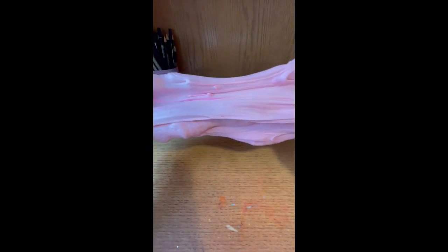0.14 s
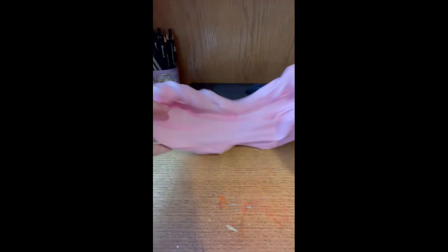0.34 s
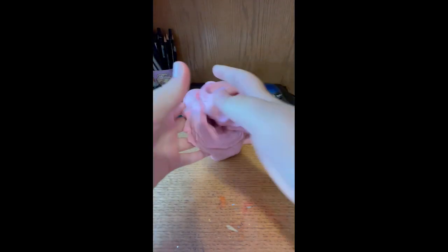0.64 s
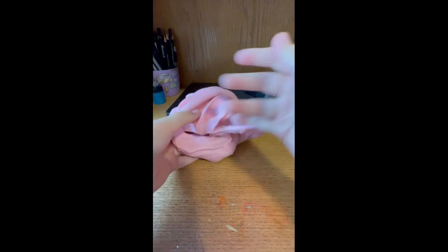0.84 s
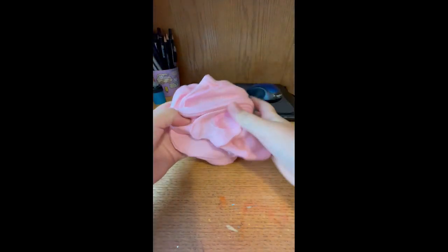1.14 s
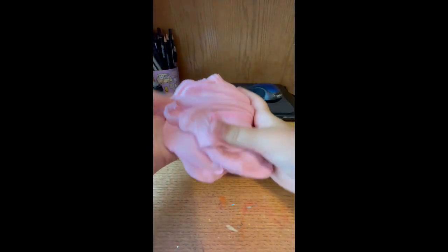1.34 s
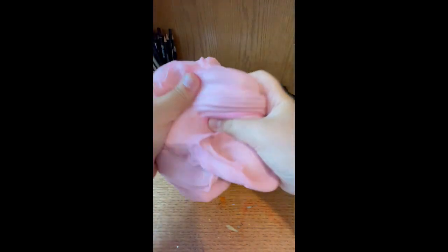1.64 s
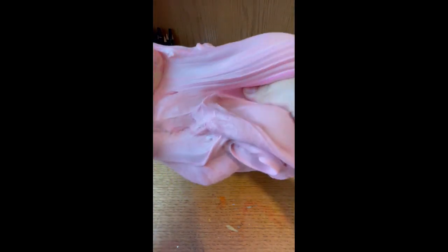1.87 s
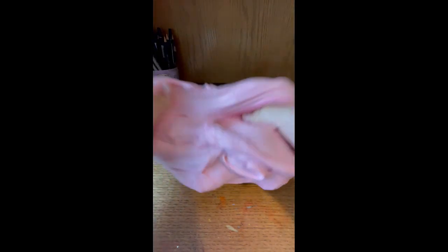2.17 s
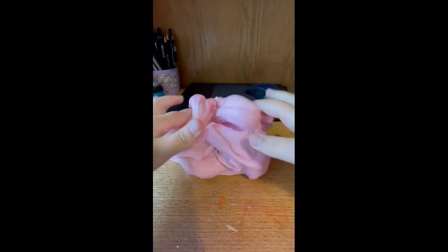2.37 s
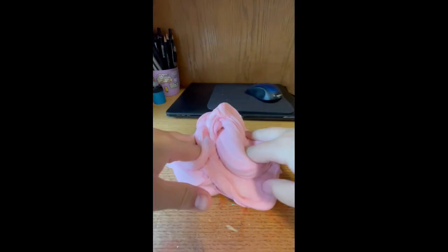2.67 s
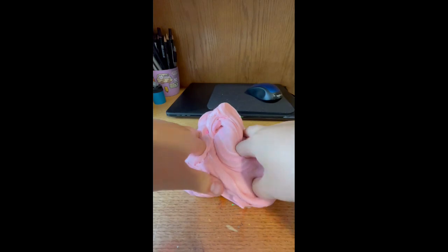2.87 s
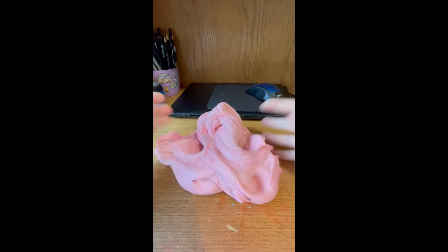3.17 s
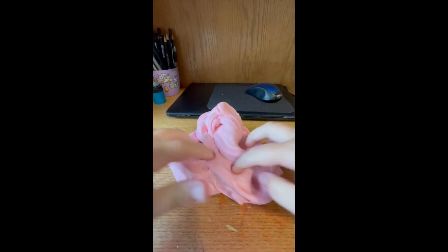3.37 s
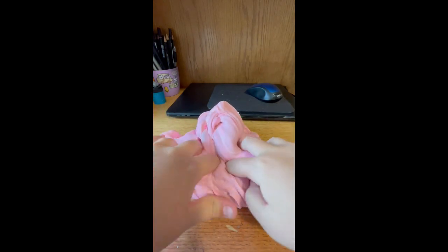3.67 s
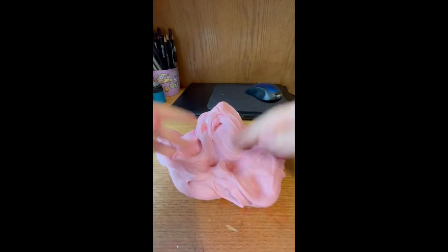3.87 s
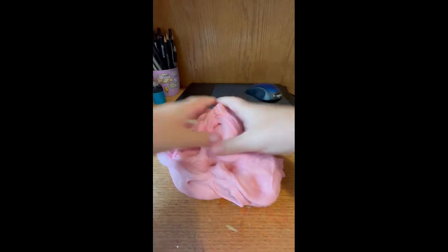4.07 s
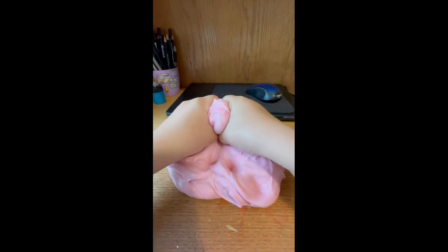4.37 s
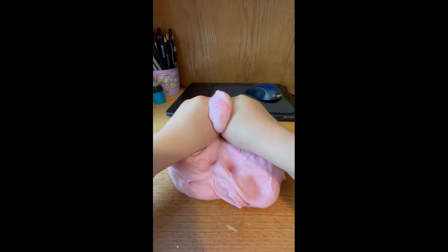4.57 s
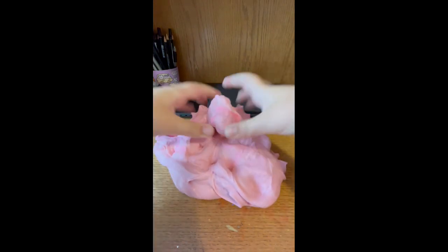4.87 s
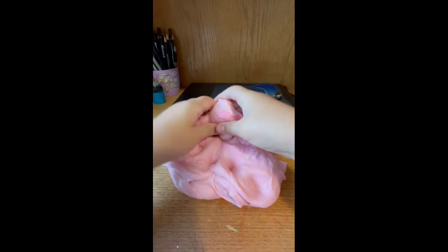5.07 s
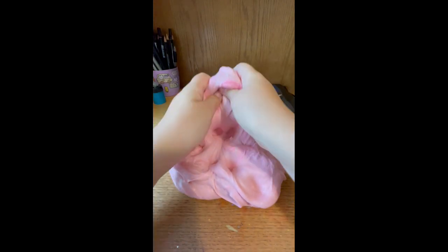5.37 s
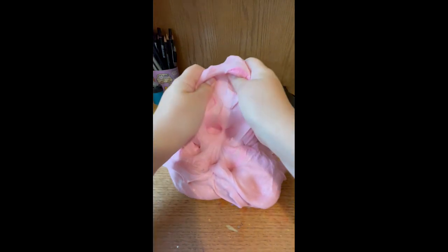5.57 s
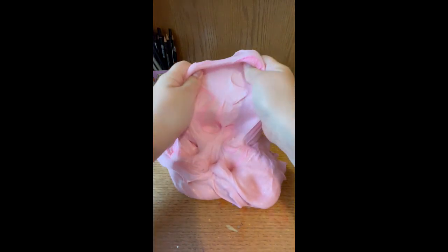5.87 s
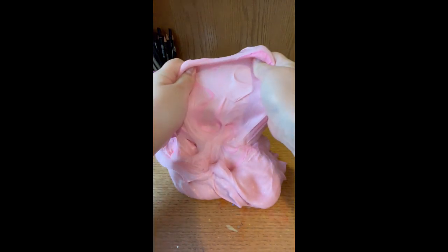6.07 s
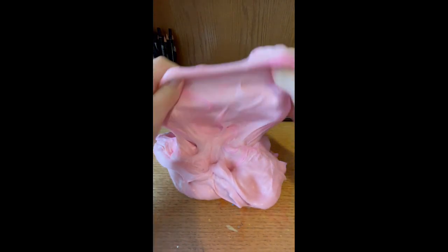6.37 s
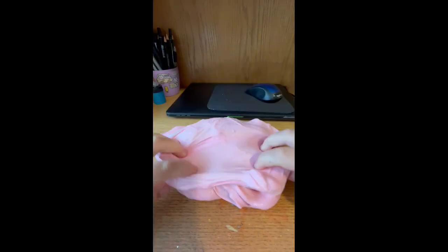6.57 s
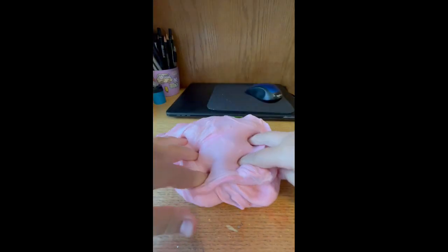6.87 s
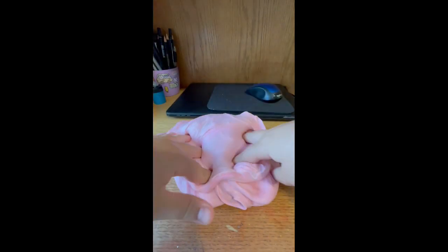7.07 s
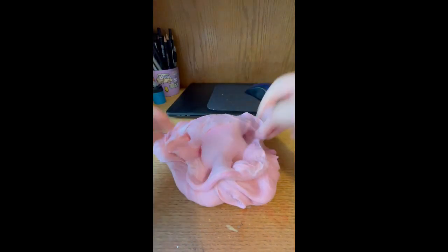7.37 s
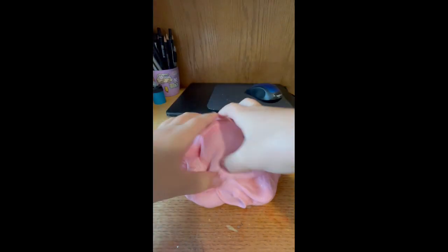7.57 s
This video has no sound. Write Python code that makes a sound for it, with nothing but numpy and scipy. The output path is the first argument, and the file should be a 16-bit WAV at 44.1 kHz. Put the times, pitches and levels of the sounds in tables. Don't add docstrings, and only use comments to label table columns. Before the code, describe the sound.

Close stereo sound of thick slime worked by two hands on a wooden desk, in a quiet, slightly hissy small room. After near silence, a sticky fizz at 0.3 s, then soft peeling and faint plops to 1.1 s. Low lumps and a rounded plop at 1.3 s, with crackly smears until 2. A fuller wet squelch and gurgle at 2.2-2.3 s, then small ticks. At 3.1 s a strong hollow plop and desk thump, with low sway fading. Another squelchy press at 3.85 s. From 4.1 s bright snaps thicken into the loudest, sharp pop at 4.47 s; a bubbly gurgling squeeze follows at 4.8. A crisp snap at 5.2 leads into ticks, then faint creeping threads to 6.3. Brief peeling at 6.4, soft sliding hiss from 6.8, then a heavy squelch, plop and tiny high squeak at 7.35 s, ending in sliding and a snap at 7.6.

```python
import sys
import numpy as np
from scipy import signal
from scipy.fft import rfft, irfft, next_fast_len
from scipy.io import wavfile
from scipy.ndimage import uniform_filter1d, minimum_filter1d

SR = 44100
rng = np.random.default_rng(int(sys.argv[2]) if len(sys.argv) > 2 else 0)


def magnitude_from_level(level_db):
    exponent = np.asarray(level_db, float) / 20
    return 10 ** exponent


def to_wav(sig):
    pcm = np.clip(np.atleast_2d(sig), -1, 1) * 32767
    pcm = np.round(pcm).astype(np.int16)
    wavfile.write(sys.argv[1], SR, pcm.T)


N = 340893


def evened(x):
    return x / np.sqrt(np.mean(x ** 2) + 1e-20)


def peaked(x):
    return x / np.sqrt(uniform_filter1d(x ** 2, 44).max())


def steadied(x, window_ms, share):
    power = uniform_filter1d(x ** 2, max(int(window_ms * SR / 1000), 1))
    return evened(x / (power + 1e-9) ** (share / 2))


def read(points, hz):
    f, value = np.transpose(points)
    return np.interp(np.log(hz + 1), np.log(f + 1), value)


def colour(x, spectrum):
    size = next_fast_len(x.shape[-1])
    gain = magnitude_from_level(read(spectrum, np.fft.rfftfreq(size, 1 / SR)))
    return irfft(rfft(x, size) * gain, size)[..., :x.shape[-1]]


def add(mix, start_s, sound):
    part = mix[..., round(start_s * SR):][..., :sound.shape[-1]]
    part += sound[..., :part.shape[-1]]


def level(rows):
    return magnitude_from_level(np.interp(np.arange(N) / SR, *np.transpose(rows), left=-140, right=-140))


def strokes(rows, rise_db_s, steepness=1):
    t = np.arange(0, N, 32) / SR
    power = 0
    for s, hold, top_db, fall_db_s in rows:
        slope_db = np.minimum((t - s) * rise_db_s, (s + hold - t) * fall_db_s)
        power = power + magnitude_from_level(top_db + steepness * np.minimum(slope_db, 0)) ** 2
    return np.interp(np.arange(N) / SR, t, np.sqrt(power))


def ring(x, modes):
    out = 0
    for hz, width_hz, db in modes:
        radius = np.exp(-np.pi * width_hz * 1.5 / SR)
        pole = radius * np.exp(2j * np.pi * hz / SR)
        mode = signal.lfilter([1], [1, -2 * pole, pole ** 2], x + 0j).real
        out = out + magnitude_from_level(db) * evened(mode)
    return evened(colour(out, [(hz * 1.4, 0), (hz * 3, -25)]))


def grains(per_s, spread_db, clump_db, clump_ms):
    clumps = evened(uniform_filter1d(rng.standard_normal(N), max(int(clump_ms * SR / 1000), 1)))
    sizes = magnitude_from_level(spread_db * np.minimum(rng.exponential(1, N), 5) + clump_db * clumps)
    return rng.standard_normal(N) * sizes * (rng.random(N) < per_s / SR)


def patchy(x, patchy_db):
    z = signal.stft(x, nperseg=256)[2]
    patches = uniform_filter1d(uniform_filter1d(rng.standard_normal(z.shape), 6, 0), 8, 1)
    return signal.istft(z * magnitude_from_level(patchy_db * evened(patches)), nperseg=256)[1][:N]


# (frequency [Hz], level [dB])
HUSH = [(25, 4), (65, 5), (140, -15), (260, -22), (370, -21), (600, -32), (7670, -26), (16400, -24)]
# (frequency [Hz], side-mid [dB])
HUSH_WIDTH = [(60, -9), (250, 0), (700, 9), (1300, 7), (4400, -4), (15000, -8)]
HUSH_DB = -81


def hush():
    mid, side = (patchy(colour(v, HUSH), 1.5) for v in rng.standard_normal((2, N)))
    side = colour(side, HUSH_WIDTH)
    return magnitude_from_level(HUSH_DB) * evened(np.array([mid + side, mid - side]))


# (frequency [Hz], t60 [s])
ROOM = [(500, 0.27), (12000, 0.09)]


def room(x):
    taps = rng.standard_normal((2, SR // 3)) * (rng.random((2, SR // 3)) < 0.06)
    taps[:, :70] = 0
    hz, t, z = signal.stft(taps, SR, nperseg=128)
    decay = magnitude_from_level(-60 * t / read(ROOM, hz)[:, None])
    tail = signal.istft(z * decay, SR, nperseg=128)[1]
    return signal.fftconvolve(x[None], tail / np.linalg.norm(tail[0]), axes=1)[:, :N]


# (frequency [Hz], side-mid [dB])
WIDTH = [(100, -22), (300, -10), (700, -1), (2500, -3), (8000, -0.5), (15000, -8)]


def widen(x):
    z = signal.stft(x, nperseg=256)[2]
    a, b = (evened(uniform_filter1d(uniform_filter1d(v, 5, 0), 40, 1))
            for v in rng.standard_normal((2, *z.shape)))
    side = signal.istft(z * (0.2 * a + 0.9j * b), nperseg=256)[1][:N]
    side = colour(side, WIDTH)
    return np.array([x + side, x - side])


# (time [s], pitch [Hz], level [dB], octave [dB])
SQUEAK = [
    (7.346, 5630, -35, -26),
    (7.3496, 5623, -15, -8),
    (7.351, 6130, -8.5, -8.5),
    (7.3514, 6800, -8.5, 2),
    (7.3525, 6610, -8, -11),
    (7.353, 6420, -14.5, 3.5),
    (7.356, 6240, -39, 6),
    (7.356, 5700, -24, -22),
    (7.372, 6500, -59.5, -15),
]


def squeak():
    s, *columns = np.transpose(SQUEAK)
    t, out = np.arange(s[0], s[-1], 1 / SR), np.zeros(N)
    hz, db, octave_db = (np.interp(t, s, c) for c in columns)
    flutter = evened(uniform_filter1d(rng.standard_normal(len(t)), 12))
    phase = 2 * np.pi * np.cumsum(hz * (1 + 0.017 * flutter)) / SR
    add(out, s[0], magnitude_from_level(db) * (np.sin(phase) + magnitude_from_level(octave_db) * np.sin(2 * phase)))
    return out


# (time [s], peak [dB], pitch [Hz], t60 [s])
PLOPS = [(0.766, -40, 750, 0.075), (0.839, -43, 730, 0.045), (1.332, -29, 283, 0.036),
         (1.552, -41.5, 770, 0.041), (1.695, -45, 676, 0.038), (2.292, -27, 243, 0.039),
         (2.653, -51, 440, 0.021), (2.855, -49, 368, 0.05), (2.977, -46.5, 192, 0.11),
         (3.127, -17, 422, 0.021), (3.169, -24.5, 290, 0.022), (3.301, -38, 390, 0.038),
         (3.456, -44.5, 279, 0.025), (3.521, -49.5, 446, 0.047), (3.889, -34, 240, 0.12),
         (4.292, -43.5, 398, 0.026), (4.358, -24.5, 355, 0.018), (4.436, -42, 487, 0.022),
         (4.467, -29.5, 456, 0.069), (4.846, -28, 299.4, 0.03), (4.819, -33, 250, 0.09),
         (5.269, -37, 247, 0.055), (5.31, -38, 249, 0.055), (5.384, -40, 288, 0.026),
         (5.496, -41, 450, 0.039), (7.329, -23.5, 425, 0.039), (7.391, -27.5, 250, 0.019)]
# (time [s], peak [dB], pitch [Hz], t60 [s])
LUMPS = [(1.126, -43, 120, 0.24), (1.362, -39, 135, 0.1), (1.247, -41, 115, 0.12), (1.3, -42, 105, 0.1),
         (3.099, -25, 112, 0.12), (3.162, -27, 122, 0.2), (7.335, -28, 115, 0.1), (7.375, -28, 110, 0.1),
         (7.02, -56, 60, 0.1), (1.328, -28.5, 159, 0.095), (0.634, -52.5, 188, 0.045),
         (1.382, -46, 430, 0.04), (1.628, -43.5, 700, 0.024), (4.861, -27, 250, 0.011),
         (5.478, -45, 562, 0.03), (3.602, -57, 800, 0.0327), (1.83, -50, 400, 0.03),
         (3.812, -44, 333, 0.024), (4.9, -42.5, 450, 0.025)]


def plops():
    out, t = np.zeros(N), np.arange(6000) / SR
    for s, db, hz, t60_s in PLOPS + LUMPS:
        second = 0.47 * min(hz / 260, 1, 450 / hz) ** 2
        phase = 2 * np.pi * np.cumsum(hz * (1 + 0.66 * np.exp(-t / 0.0014))) / SR
        wave = np.sin(phase) + second * np.sin(0.72 * phase)
        wave = wave * (1 - np.exp(-(t / 0.0025) ** 2)) * magnitude_from_level(-60 * t / t60_s)
        add(out, s, magnitude_from_level(db) * wave / abs(wave).max())
    return out


# (time [s], hold [s], rms level [dB], first pitch [Hz], last pitch [Hz])
GURGLES = [(0.553, 0.0042, -61.5, 895, 860), (0.638, 0.0055, -67, 3560, 3500),
           (0.828, 0.011, -56.5, 2310, 2500), (0.829, 0.015, -55, 714, 740),
           (0.84, 0.0092, -55.5, 3300, 3270), (0.988, 0.0048, -70, 2000, 1900),
           (2.202, 0.035, -61.5, 3200, 3300), (2.231, 0.054, -47.5, 3400, 3080),
           (2.234, 0.053, -44, 420, 480), (2.271, 0.02, -45.5, 1700, 2200), (2.299, 0.036, -43.5, 740, 990),
           (2.61, 0.01, -57.5, 500, 400), (2.653, 0.01, -58, 950, 700), (2.87, 0.045, -59.5, 330, 199),
           (4.798, 0.0081, -42, 550, 500), (3.306, 0.0057, -66, 2700, 2700),
           (3.459, 0.0054, -54, 1310, 500), (3.948, 0.015, -42.5, 800, 865), (4.717, 0.02, -65, 1810, 1520),
           (4.757, 0.016, -54, 1500, 1763), (4.77, 0.004, -40, 2050, 2000), (4.78, 0.018, -47, 2800, 2700),
           (4.815, 0.0096, -45.5, 1690, 1380), (4.829, 0.025, -45.5, 3250, 3240),
           (4.838, 0.026, -38, 1490, 1430), (4.843, 0.02, -39, 880, 940), (4.876, 0.0055, -37, 1540, 1580),
           (4.886, 0.0065, -38, 1460, 1770), (5.079, 0.0044, -62.5, 1500, 1550),
           (5.093, 0.0062, -62, 800, 740), (5.163, 0.005, -66, 1550, 1550),
           (5.204, 0.016, -58.5, 2600, 2970), (5.252, 0.029, -56, 1290, 1480),
           (6.591, 0.0074, -58.5, 1910, 1780), (6.618, 0.012, -61, 1606, 1790)]
GURGLE_EDGE_DB_S, GURGLE_SHARPNESS = 1500, 4.4


def gurgles():
    out, air = np.zeros(N), grains(2500, 2.0, 2.03, 3)
    for s, hold, db, first_hz, last_hz in GURGLES:
        t = np.arange(-0.03, hold + 0.03, 1 / SR)
        hz = np.interp(t, [0, hold], [first_hz, last_hz])
        turn = np.exp(2j * np.pi * np.cumsum(hz) / SR)
        r = np.exp(-np.pi * first_hz / GURGLE_SHARPNESS / SR)
        still = air[round(s * SR):][:len(t)] / turn
        note = (turn * signal.lfilter([1], [1, -2 * r, r * r], still)).real
        edges = magnitude_from_level(GURGLE_EDGE_DB_S * np.minimum(np.minimum(t, hold - t), 0))
        add(out, s + t[0], magnitude_from_level(db) * edges * steadied(note, 13, 0.606))
    return out


# (peak time [s], rms level [dB], brightest [Hz], length [ms])
FILMS = [(0.3353, -37, 8460, 3.4), (0.9284, -54, 13800, 2), (3.1262, -36, 6200, 4),
         (1.0065, -49.5, 12500, 2.5), (1.47, -41.5, 13700, 0.83), (1.5774, -38.5, 9900, 9),
         (1.6121, -42.5, 11000, 1.8), (1.847, -39.5, 9500, 0.73), (1.934, -42, 6540, 6),
         (2.0328, -52, 14300, 2.9), (2.234, -31, 8400, 2.8), (2.871, -47, 4200, 4.8),
         (3.519, -46, 6760, 3.3), (3.6017, -44.5, 15400, 3.5), (3.8509, -31, 6000, 4),
         (3.865, -31, 9800, 2.5), (4.147, -27.5, 9600, 3.5), (4.2642, -33, 5500, 1.0),
         (4.31, -29, 3142, 1.6), (4.3337, -31, 5600, 1.5), (4.3638, -33, 7800, 1.8),
         (4.3926, -34, 7670, 2.1), (4.4695, -12.5, 8000, 3.0), (5.1949, -28.5, 14200, 1.6),
         (5.3135, -45.5, 6540, 0.95), (5.3328, -53, 13300, 1.5), (5.3844, -43.5, 5700, 2.2),
         (6.1186, -57, 6100, 1.4), (7.215, -52.5, 13550, 1.7), (7.609, -42.5, 14300, 3.6)]
# (peak time [s], rms level [dB], brightest [Hz], length [ms])
POCKETS = [(1.3887, -51, 7100, 8.7), (1.6982, -41.5, 3320, 12.5), (1.7511, -43, 3270, 4.8),
           (1.882, -42, 9350, 0.59), (2.581, -52.5, 5930, 5.7), (2.7463, -47, 2660, 4.2),
           (3.1255, -36, 2910, 5), (3.8091, -42.5, 4100, 4.7), (3.889, -38, 6185, 8),
           (4.1937, -43.5, 2030, 1.5), (4.3875, -35, 9050, 1.7), (4.4478, -45.5, 2160, 2.4),
           (4.5609, -42, 14000, 1.9), (5.2707, -40, 6550, 4.2), (6.8639, -50, 3975, 2.7)]
# (peak time [s], rms level [dB])
LIPS = [(1.556, -63), (1.9892, -69), (2.043, -70.5), (2.6524, -68.5), (3.4584, -70), (4.358, -44),
        (4.5118, -52.5), (4.7786, -45), (6.879, -64.5), (7.3299, -47), (7.7025, -61.5)]
# (peak time [s], rms level [dB], brightest [Hz])
THREADS = [(5.716, -67, 3490), (5.852, -65, 5740), (5.992, -64, 8990), (6.02, -69, 4980),
           (6.098, -64, 8050), (6.309, -65.5, 7970), (5.665, -63.5, 8060), (5.759, -61, 4530),
           (5.791, -56.5, 4500), (5.813, -56, 6500), (5.877, -62.5, 4500), (4.2435, -45, 7000),
           (4.3105, -33, 14000), (4.377, -38, 13500), (4.265, -38, 13000), (4.334, -36, 13500),
           (2.173, -55, 11000)]
# (peak time [s], rms level [dB], brightest [Hz])
TICKS = [(0.77, -60, 2970), (1.048, -53, 3000), (2.608, -46, 2500), (2.651, -49, 13400),
         (2.772, -52, 13000), (2.8425, -60, 2720), (2.9085, -51, 9700), (3.062, -54.5, 3220),
         (3.083, -51.5, 3170), (3.404, -59.5, 8000), (3.437, -56, 14000), (1.627, -49.5, 3200),
         (1.658, -49, 13000), (1.73, -54, 7000), (2.076, -59.5, 2200), (3.392, -70, 2000),
         (3.43, -70, 2470), (3.535, -62, 1100), (3.985, -50, 1500), (4.197, -45, 6200), (4.438, -39, 14500),
         (4.692, -55, 9000), (4.347, -47.5, 1795), (4.577, -47, 8000), (4.594, -53, 4560),
         (4.655, -53, 13100), (6.778, -64.5, 1500), (6.82, -60, 900), (7.157, -66, 5000),
         (7.668, -61, 1200), (2.508, -56, 9000), (2.695, -57, 1800), (2.288, -40, 3000), (4.889, -41, 3900),
         (4.4679, -19.5, 5500), (4.469, -28, 3000), (5.0635, -65, 2480), (5.085, -55.5, 13500),
         (5.112, -64, 2910), (5.126, -51.5, 2100), (5.176, -51, 3000), (5.186, -52, 1600),
         (5.218, -56, 1700), (5.345, -51.5, 4200), (5.401, -56, 2310), (5.432, -57, 14000),
         (5.452, -58, 3800), (5.479, -58, 2070), (5.513, -52.5, 1200), (5.538, -54, 4170)]
LIP_HZ, LIP_MS, THREAD_MS, TICK_MS = 2150, 2.8, 1.2, 3.8
FILM_BODY_DB, POCKET_BODY_DB, TICK_BODY_DB = -14, 1, -8
LIP_BRIGHT_DB, LIP_BODY_DB = -12, 19


def bursts():
    films = [(*row, row[1] + FILM_BODY_DB) for row in FILMS]
    pockets = [(*row, row[1] + POCKET_BODY_DB) for row in POCKETS]
    lips = [(s, db + LIP_BRIGHT_DB, LIP_HZ, LIP_MS, db + LIP_BODY_DB) for s, db in LIPS]
    threads = [(*row, THREAD_MS, row[1] + 2 * FILM_BODY_DB) for row in THREADS]
    ticks = [(*row, TICK_MS, row[1] + TICK_BODY_DB) for row in TICKS]
    return films + pockets + lips + threads + ticks


# (frequency [Hz], density [dB per Hz])
SMACK = [(300, -23), (650, -1.5), (900, -2.5), (1600, -4), (2600, -7), (3600, -15)]


def snaps():
    out, t = np.zeros(N), np.arange(-512, 1536) / SR
    for s, db, hz, ms, dull_db in bursts():
        noise = rng.standard_normal(2048)
        u = t * 1000 / max(ms, 0.5)
        decay = 0.89 * np.exp(-u / 0.45) + 0.11 * np.exp(-u * 0.3)
        shape = np.where(u < 0, np.exp(-(u / 0.45) ** 2), decay)
        bright = colour(noise, [(hz / 8, -28), (hz * 0.45, -16), (hz * 0.89, -6), (hz, 0),
                                (hz * 1.2, -6), (hz * 1.6, -22), (hz * 4, -32)])
        bright = colour(bright, [(min(1400, hz / 2), -30.5), (min(2100, hz * 0.69), -2)])
        dull = colour(noise, SMACK)
        add(out, s - 512 / SR, magnitude_from_level(db) * peaked(bright * shape) + magnitude_from_level(dull_db) * peaked(dull * shape))
    return out


# (frequency [Hz], width [Hz], level [dB])
DESK = [(51.5, 3.7, -12.5), (104.3, 34, 1.5), (125.8, 22, 2.5), (160, 78, -1.5)]
# (time [s], hold [s], level [dB])
PUSHES = [(0.392, 0.0047, -48), (0.635, 0.015, -62.5), (0.83, 0.0088, -67), (1.12, 0.004, -62),
          (1.25, 0.0035, -58), (1.318, 0.09, -50), (1.565, 0.0091, -58), (1.819, 0.013, -66.5),
          (2.29, 0.036, -37.5), (2.5, 0.16, -67), (2.84, 0.27, -61), (3.12, 0.083, -40), (3.232, 0.17, -52),
          (3.666, 0.18, -68.5), (3.839, 0.12, -41.5), (4.141, 0.01, -46.5), (4.312, 0.2, -57.5),
          (4.797, 0.12, -44), (5.084, 0.41, -53.5), (6.378, 0.065, -52), (6.602, 0.0082, -54),
          (6.879, 0.01, -61), (7.026, 0.05, -80), (7.333, 0.06, -42), (7.604, 0.018, -60)]
PUSH_RISE_DB_S, PUSH_FALL_DB_S, CREEP_DESK_DB = 1396.5, 170.5, -6.5
# (time [s], level [dB])
SWAY = [
    (3.1, -94.5),
    (3.3, -40.5),
    (3.47, -55.5),
    (3.85, -90.5),
]
SWAY_HZ = 50.3


def desk(creep):
    boom = steadied(ring(grains(280, 3.5, 2.1, 45), DESK), 73, 0.93)
    pushing = strokes([(*row, PUSH_FALL_DB_S) for row in PUSHES], PUSH_RISE_DB_S)
    sway = np.sin(2 * np.pi * SWAY_HZ * np.arange(N) / SR)
    return (pushing + creep * magnitude_from_level(CREEP_DESK_DB)) * boom + level(SWAY) * sway


# (frequency [Hz], width [Hz], level [dB])
HOLLOW = [(470, 300, 5), (2420, 80, 0), (2600, 90, -3), (4200, 320, -10), (5900, 350, -11)]
# (time [s], hold [s], level [dB])
SLIDES = [
    (3.96, 0.06, -56.5),
    (4.04, 0.042, -65.5),
    (6.831, 0.26, -64),
    (7.405, 0.27, -62),
]
SLIDE_EDGE_DB_S = 600


def slides():
    sliding = strokes([(*row, SLIDE_EDGE_DB_S) for row in SLIDES], SLIDE_EDGE_DB_S)
    hiss = ring(rng.standard_normal(N), HOLLOW)
    hiss = colour(hiss, [(720, 0), (900, -14), (1900, -8), (2300, 0)])
    t = np.arange(N) / SR
    speed = np.ones(N)
    for s, hold, db in SLIDES:
        speed += 0.08 * (t > s - 0.05) * np.exp(-abs(t - s) / 0.08)
    return sliding, sliding * np.interp(np.cumsum(speed) % N, np.arange(N), hiss)


# (frequency [Hz], width [Hz], level [dB])
SQUELCH = [(250, 240, 1), (387, 200, 6.5), (640, 260, -6)]
# (time [s], hold [s], level [dB])
SQUEEZES = [(0.326, 0.14, -65), (0.635, 0.019, -75.5), (0.766, 0.021, -64), (1.054, 0.17, -74.5),
            (1.343, 0.062, -57), (1.546, 0.35, -64), (2.237, 0.1, -43.5), (2.584, 0.14, -62.5),
            (2.864, 0.25, -70), (3.126, 0.0032, -36.5), (3.166, 0.064, -52.5), (3.889, 0.049, -37.5),
            (3.92, 0.022, -45), (4.142, 0.0065, -53.5), (4.348, 0.044, -54.5), (4.474, 0.0071, -49.5),
            (4.787, 0.071, -40.5), (5.065, 0.14, -66.5), (5.274, 0.0087, -50.5), (5.406, 0.13, -56),
            (6.393, 0.021, -56), (6.828, 0.075, -57), (7.005, 0.054, -65.5), (7.343, 0.042, -37),
            (7.519, 0.081, -63), (7.594, 0.004, -51.5)]
SQUEEZE_RISE_DB_S, SQUEEZE_FALL_DB_S, CREEP_SQUELCH_DB = 898, 203, -7.5


def cavities(creep, sliding):
    squelch = steadied(ring(grains(1200, 2.4, 4.5, 14), SQUELCH), 30, 0.65)
    squeezing = strokes([(*row, SQUEEZE_FALL_DB_S) for row in SQUEEZES], SQUEEZE_RISE_DB_S)
    gripping = 1 / (1 + sliding / magnitude_from_level(-64.5))
    murmur = colour(squelch, [(380, 0), (560, -23.5)])
    return squeezing * gripping * squelch + creep * magnitude_from_level(CREEP_SQUELCH_DB) * murmur


# (time [s], hold [s], fizz level [dB], smack-fizz [dB])
TEARS = [(0.761, 0.079, -54, -12.5), (1.195, 0.023, -53, -8), (1.386, 0.004, -49.5, -28),
         (1.563, 0.018, -51.5, -4), (1.682, 0.009, -68, 12), (2.232, 0.105, -39.5, -4),
         (2.858, 0.0093, -54, -1.5), (3.099, 0.11, -48, 1.5), (3.802, 0.015, -55.5, -3),
         (3.851, 0.071, -40.5, -2.5), (4.146, 0.0069, -48, -4.5), (4.44, 0.09, -46.5, -11.5),
         (4.777, 0.12, -42.5, 3), (5.243, 0.012, -53, -7.5), (6.386, 0.018, -45.5, -10.5),
         (7.333, 0.069, -43, -2), (7.619, 0.039, -58.5, -4.5)]
TEAR_RISE_DB_S, TEAR_FALL_DB_S = 550.5, 354.5
# (time [s], hold [s], fizz level [dB], smack-fizz [dB], fall [dB/s])
SMEARS = [(0.002, 0.019, -67.5, -24, 72), (0.333, 0.089, -45, -10, 100), (0.68, 0.18, -59.5, -12, 138),
          (1.11, 0.0033, -53.5, -5, 190), (1.27, 0.22, -63, -3, 98), (1.66, 0.26, -56.5, -13, 76),
          (2.38, 0.039, -60.5, -6.5, 145), (2.596, 0.0043, -55, -8, 57.5), (2.9, 0.37, -67, -1, 100),
          (3.46, 0.075, -63.5, -7, 72), (3.97, 0.0044, -61.5, -1.5, 142), (4.31, 0.03, -43, -9.5, 400),
          (4.365, 0.03, -46, -8, 150), (4.58, 0.2, -61.5, -18.5, 152), (5.1, 0.1, -66.5, 0.5, 107),
          (5.32, 0.2, -57, -8, 101), (6.45, 0.045, -49, -9.5, 129), (6.617, 0.0034, -51.5, -5.5, 334),
          (6.78, 0.3, -69.5, -0.5, 95)]
SMEAR_RISE_DB_S, CREEP_SMACK_DB = 172, -24.5
WET_STEEPNESS = 1.35


def peeling(creep):
    tears = [(*row, TEAR_FALL_DB_S) for row in TEARS]
    fizzing, smacking = creep, creep * magnitude_from_level(CREEP_SMACK_DB)
    for rows, rise in (tears, TEAR_RISE_DB_S), (SMEARS, SMEAR_RISE_DB_S):
        dry_rows = [(s, hold, db, fall) for s, hold, db, wet_db, fall in rows]
        wet_rows = [(s, hold, db + wet_db, fall) for s, hold, db, wet_db, fall in rows]
        fizzing = np.hypot(fizzing, strokes(dry_rows, rise))
        smacking = np.hypot(smacking, strokes(wet_rows, rise, WET_STEEPNESS))
    return fizzing, smacking


# (frequency [Hz], density [dB per Hz])
FIZZ = [(1180, -28.5), (2000, -12), (3270, -5), (4870, -8), (7430, -2.5), (9500, -2.5), (11000, -7.5),
        (13200, -0.5), (15700, -9), (16400, -51)]


def skin(creep):
    fizz = steadied(patchy(colour(grains(12000, 0.9, 2.0, 9), FIZZ), 3.0), 35, 0.5)
    smack = steadied(patchy(colour(grains(4000, 1.6, 1.8, 5), SMACK), 2.8), 25, 0.6)
    ticks = patchy(colour(grains(150, 1.2, 1.5, 60), [(500, -24), (1500, -1)]), 5)
    fizzing, smacking = peeling(creep)
    return fizzing * (fizz + 0.2 * evened(ticks)) + smacking * smack


# (time [s], level [dB])
CREEP = [(0.0, -85.5), (2.1, -85), (3.25, -71), (3.73, -78), (5.03, -88), (5.68, -70.5), (6.19, -80.5),
         (6.33, -77), (7.17, -71.5), (7.28, -83), (7.46, -68), (7.73, -66)]


def kneading():
    creep = level(CREEP)
    sliding, slide = slides()
    return skin(creep) + slide + cavities(creep, sliding) + desk(creep)


def scene():
    pops = plops()
    centred = 0.55 * pops
    near = kneading() + pops + squeak() + snaps() + gurgles()
    send = colour(near, [(150, -35.5), (500, 5.5), (10000, 5.5), (12000, -6)])
    return widen(near - centred) + centred + magnitude_from_level(-19.0) * room(send) + hush()


def top_cut(x):
    return signal.sosfilt(signal.butter(12, 16610, fs=SR, output="sos"), x)


def record(dry):
    x = colour(dry, [(22, -19), (45, 1.5), (15400, -1.5), (16400, -6.5), (16700, -45.0)])
    mid, side = colour(np.array([x[0] + x[1], x[0] - x[1]]) / 2, [(6700, -80), (6900, 0)])
    power = np.pad(uniform_filter1d(mid ** 2, 128), (0, -N % 1024), "edge").reshape(-1, 1024)
    peak, mean = power.max(1), power.mean(1)
    steady = minimum_filter1d(1.0 * (peak < 3.1 * mean), 2)
    steady = uniform_filter1d(np.repeat(steady, 1024)[:N], 400)
    lost = colour(side, [(15350, 0), (15600, -80)]) * steady
    calm = uniform_filter1d(np.repeat(1.0 * (peak < 6 * mean), 1024)[:N], 400)
    x = x - colour(x, [(15350, -80), (15600, 0)]) * calm
    return top_cut(x - np.array([lost, -lost]))


dry = scene()
out = record(dry)
to_wav(out)
```